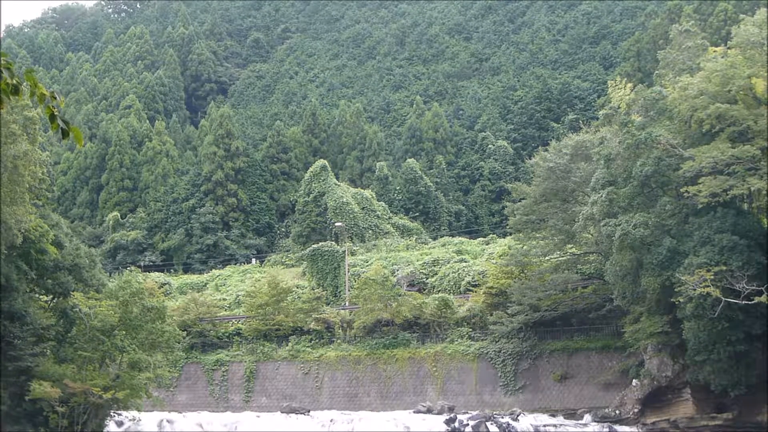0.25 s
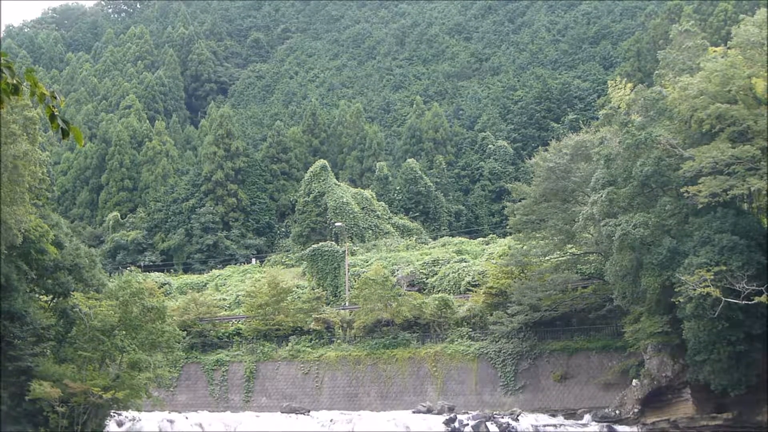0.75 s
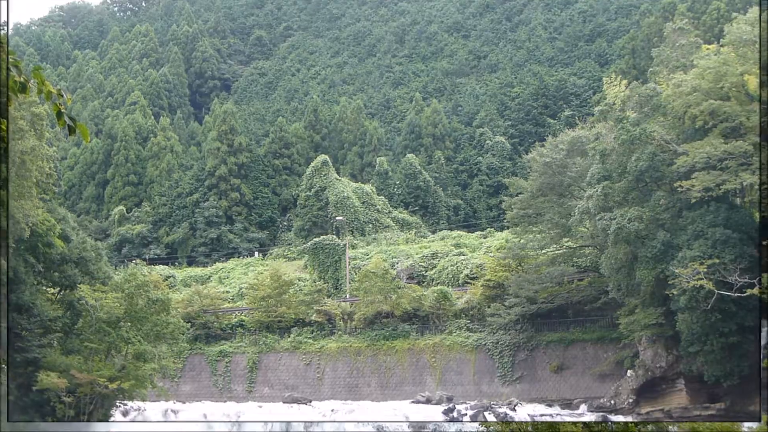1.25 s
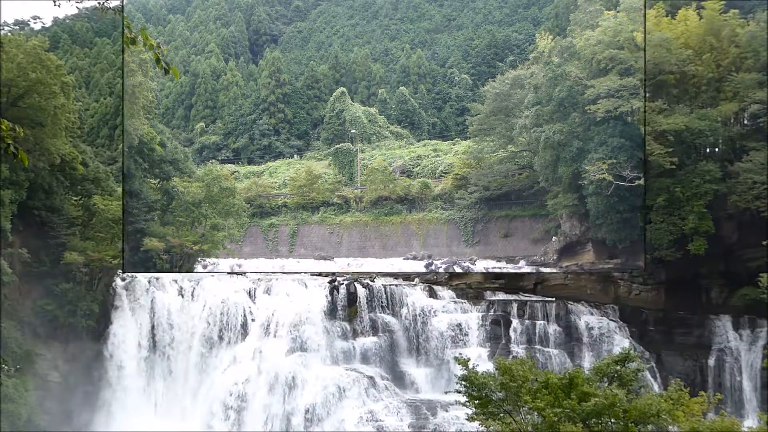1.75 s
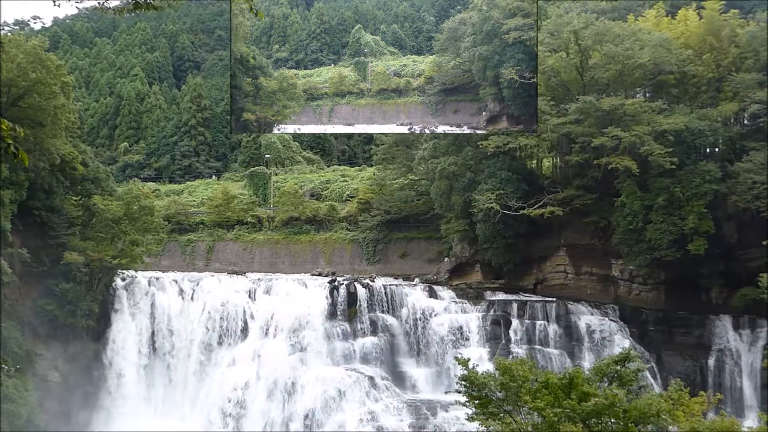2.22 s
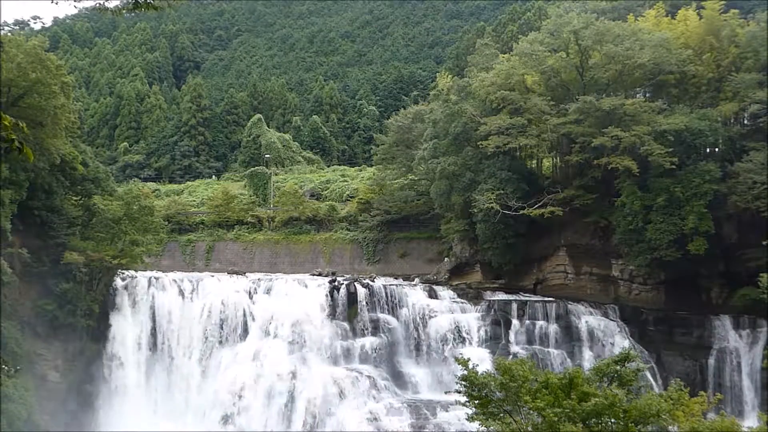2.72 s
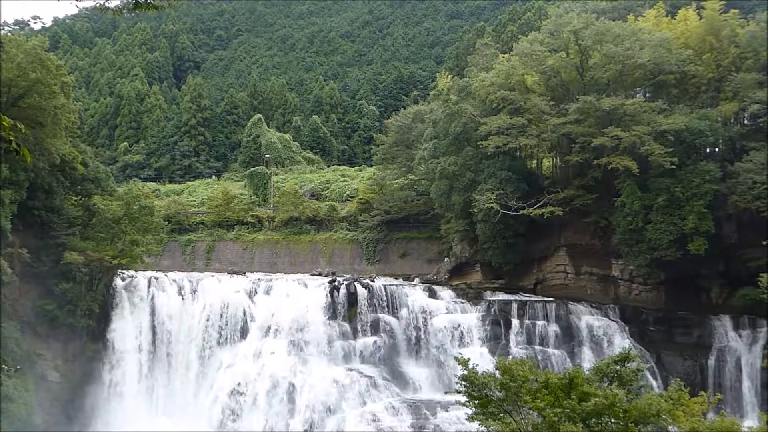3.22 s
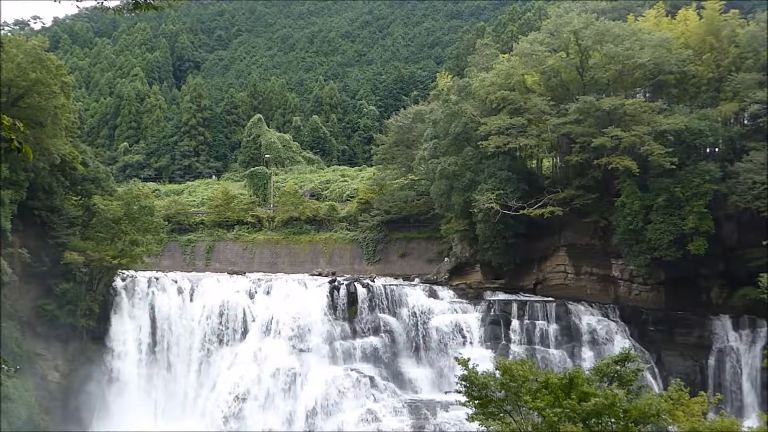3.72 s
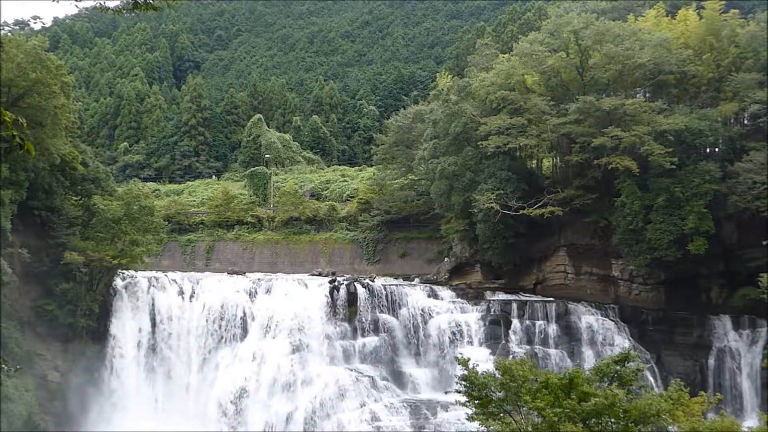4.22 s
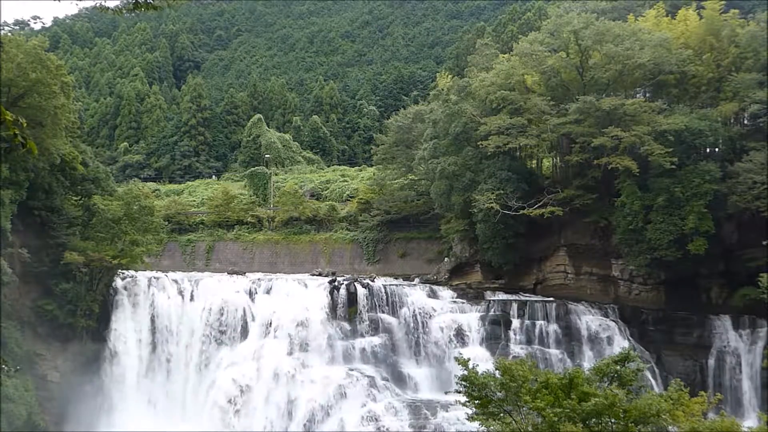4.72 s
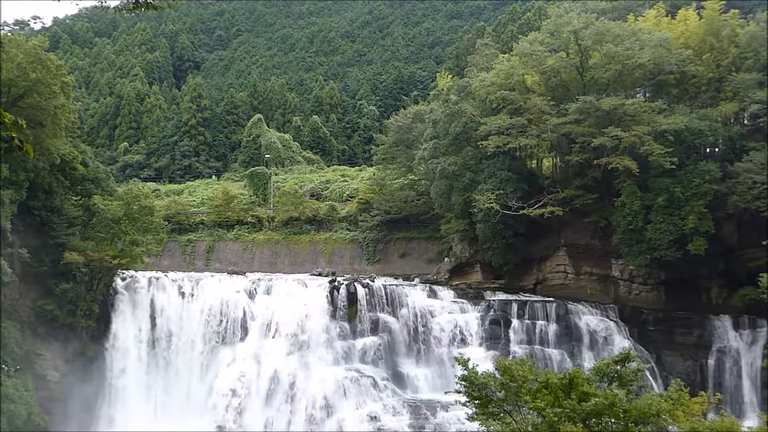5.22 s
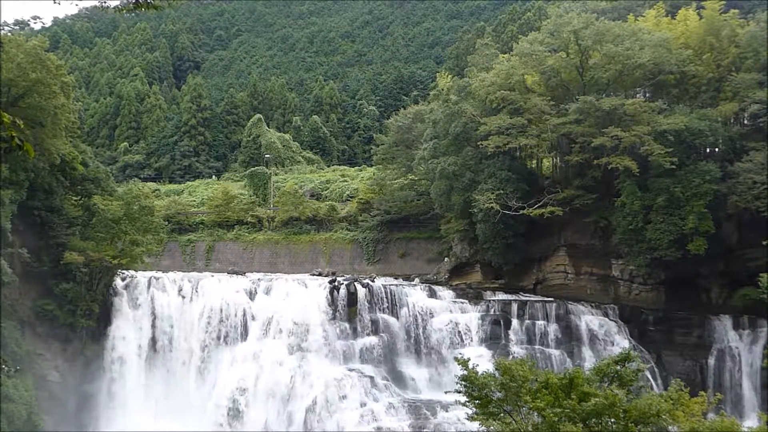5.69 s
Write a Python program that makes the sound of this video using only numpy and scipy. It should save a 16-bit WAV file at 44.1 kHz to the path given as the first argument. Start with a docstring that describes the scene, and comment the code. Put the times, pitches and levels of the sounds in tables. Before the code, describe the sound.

Stereo outdoor ambience in two abrupt passages. First, a microphone sheltered among trees picks up a raspy near cicada, a shimmering distant chorus, a rounded waterfall roar and three short, pure, high insect notes. A complete half-second silence follows. Then the microphone faces the open waterfall: broad constant rushing with brighter spray hiss, half masking the quivering cicadas. No splashes stand out.

```python
"""A waterfall in a wooded gorge with cicadas, heard from two places with a short silence between.
First, among the trees: loud cicadas, a softened roar and a few thin notes of a single insect.
Then, after the silence, facing the fall: the hiss of spray half covers the cicadas.
In both, the water is shaped noise with patchy swelling; cicadas are throbbing click trains through
resonances, one near and seven distant; the notes are slightly unsteady sines."""
import sys
import numpy as np
from scipy import signal
from scipy.fft import rfft, irfft, next_fast_len
from scipy.io import wavfile
from scipy.ndimage import uniform_filter1d, map_coordinates

SR = 44100
rng = np.random.default_rng(int(sys.argv[2]) if len(sys.argv) > 2 else 0)


def dump(signal):
    """Clip the signal to [-1, 1] and save it as 16-bit WAV at the path in sys.argv[1]."""
    limited = np.clip(np.atleast_2d(signal).T, -1, 1)
    pcm = np.round(limited * 32767).astype(np.int16)
    wavfile.write(sys.argv[1], SR, pcm)


N = 262395

# Span of each passage, sheltered then open: (start [s], end [s])
PASSAGE_SPANS_S = [(0, 1.5455), (1.983, 6)]
# Relative spectrum of the falling water: (frequency [Hz], gain [dB])
WATER_SHELTERED_DB = [(45, -36), (88, -25.5), (112, -14.5), (140, -15), (175, -7.5), (340, -0.5), (800, -4),
                      (1500, -7.5), (2400, -12), (4000, -10), (8500, -14), (10000, -15.5), (13000, -18.5),
                      (15500, -27.5)]
WATER_OPEN_DB = [(45, -36.5), (88, -24), (112, -14), (140, -11.5), (175, -5), (300, -0.5), (800, -3.5),
                 (1600, -8), (3300, -8), (6600, -11.5), (8000, -16), (10600, -12.5), (13300, -20.5),
                 (15500, -27)]
# Resonances of the distant cicadas' drums and hollow bodies: (centre [Hz], width [Hz], gain [dB])
BODY_SHELTERED_MODES = [(4100, 230, -4), (4890, 28, -2), (5343, 40, 4), (5200, 800, -5), (6540, 40, -2),
                        (6730, 60, -3), (6200, 900, -9), (7900, 1000, -13), (12650, 150, -16),
                        (13700, 200, -16), (14900, 700, -12)]
BODY_OPEN_MODES = [(4700, 1100, -4), (5820, 50, 5), (6230, 70, -1), (6600, 700, -5), (7200, 120, -6),
                   (8005, 60, -5), (14115, 110, -7)]
# Resonances of a near cicada: (centre [Hz], width [Hz], gain [dB])
BODY_NEAR_MODES = [(5500, 700, 0), (6450, 600, -2), (14950, 900, -7)]
# Likeness of left and right: (frequency [Hz], correlation [-1 to 1])
WATER_CORRELATION = [(150, 1), (450, 1), (800, 0.98), (1300, 0.83), (3000, 0.89), (4500, 0.73),
                     (9000, 0.79), (13000, .55)]
CICADA_CORRELATION = [(4000, 0.91), (8000, 0.82), (15000, 0.7)]
# Stereo tilt: (frequency [Hz], left minus right level [dB])
LEFT_MINUS_RIGHT_DB = [(700, 0), (1500, -.6), (4500, -.5), (5800, -1.4), (7500, -.8), (11000, -1.4),
                       (15000, -.3)]
# Slow level of the deep part of the roar: (time [s], level [dB])
DEEP_ROAR_DB = [(1.301, -0.4), (2.15, 0.7), (3.3, -1), (4.2, 0.5), (5.2, 1)]
# Thin notes of a single insect: (start [s], length [s], level [dB])
INSECT_NOTES = [(0.0, 0.15, -36), (.27, .09, -31), (1.137, 0.13, -30.5)]

ROAR_SHELTERED_DB, ROAR_OPEN_DB = -20.5, -20
DEEP_HZ = 1205  # the deep part is halved in amplitude here
NOTE_HZ, NOTE_WAVER_HZ, NOTE_EDGE_S = 4891, 9, .02
TOP_HZ = 15650  # upper band limit


def amp(db):
    """Decibels to gain."""
    return 10 ** (np.asarray(db) / 20)


def unit(x):
    """Scale to rms 1."""
    return x / np.sqrt(np.mean(x ** 2) + 1e-20)


def along(points, hz):
    """Read (Hz, value) points on a log frequency axis."""
    point_hz, value = np.transpose(points)
    return np.interp(np.log(hz + 1), np.log(point_hz + 1), value)


def wobble(rate_hz):
    """Smooth random curve with rate_hz knots a second."""
    knots = rng.standard_normal(int(N * rate_hz / SR) + 4)
    return map_coordinates(knots, [np.arange(N) * rate_hz / SR])


def filtered(x, response):
    """Apply a zero-phase frequency response to x."""
    m = next_fast_len(N + SR // 2)
    return irfft(rfft(x, m) * response(np.fft.rfftfreq(m, 1 / SR)), m)[..., :N]


def spread(pair, correlation):
    """Mix two unrelated signals to left and right with the given correlation."""
    def mid_side_gains(hz):
        angle = np.arccos(np.clip(along(correlation, hz), -1, 1)) / 2
        return np.array([np.cos(angle), np.sin(angle)])

    mid, side = filtered(pair, mid_side_gains)
    return np.array([mid + side, mid - side])


def waterfall(spectrum, level_db, patchy_db, surge_db):
    """Countless bubbles and drops merge into a roar; clumps swell it in patches of time and pitch."""
    z = signal.stft(rng.standard_normal((2, N)), nperseg=512)[2]
    clumps = uniform_filter1d(rng.standard_normal(z.shape[1:]), size=7, axis=0)  # across pitch
    clumps = uniform_filter1d(clumps, size=10, axis=1)  # across time
    foam = signal.istft(z * amp(patchy_db * unit(clumps)), nperseg=512)[1][:, :N]
    roar = unit(filtered(spread(foam, WATER_CORRELATION), lambda hz: amp(along(spectrum, hz))))
    deep = filtered(roar, lambda hz: 1 / (1 + (hz / DEEP_HZ) ** 4))
    spray = roar - deep
    deep_db = np.interp(np.arange(N) / SR, *np.transpose(DEEP_ROAR_DB))
    return (deep * amp(deep_db) + spray) * amp(level_db + surge_db * wobble(13))


def tymbal(click_hz, throb_hz, throb_db, swing, scatter_s):
    """One cicada's drums buckle some 400 times a second, in throbs that start fast and fade."""
    throb_cycles = np.cumsum(throb_hz * (1 + .02 * wobble(3))) / SR
    throb = 2 * np.pi * (throb_cycles + rng.random())
    effort = np.sin(throb) + .5 * np.sin(2 * throb)
    # the muscle runs slightly faster when it pulls harder
    click_rate_hz = click_hz * (1 + swing * (effort + .5 * wobble(5)))
    at = np.flatnonzero(np.diff(np.floor(np.cumsum(click_rate_hz) / SR)))
    late, size = rng.standard_normal((2, len(at)))
    where = np.clip(np.round(at + scatter_s * SR * late).astype(int), 0, N - 1)
    return np.bincount(where, amp(throb_db * effort[at] + 0.87 * size), N)


def scattered(x, t60_s):
    """Two unrelated smeared copies of x, as from trunks and leaves; decay of 60 dB in t60_s."""
    t = np.arange(SR // 4) / SR
    tails = rng.standard_normal((2, len(t))) * np.exp(-np.log(1000) * t / t60_s)
    return unit(signal.fftconvolve(x[None], tails, axes=1)[:, :N])


def resonances(modes, hz):
    """Gain of a set of resonances whose powers add."""
    power = 0
    for centre, width, db in modes:
        damping = (hz * width) ** 2
        power = power + amp(db) ** 2 * damping / ((centre ** 2 - hz ** 2) ** 2 + damping)
    return np.sqrt(power)


def near_cicada(click_hz, throb_hz, throb_db, level_db, bright_db, t60_s):
    """A close cicada: short scattering keeps its clicks distinct, a rasp of fuzzy harmonics."""
    clicks = tymbal(click_hz, throb_hz, throb_db, swing=.006, scatter_s=.000018)
    pair = spread(scattered(clicks, t60_s), CICADA_CORRELATION)
    treble = [(7000, 0.0038), (14000, bright_db)]  # (frequency [Hz], gain [dB])
    voice = filtered(pair, lambda hz: resonances(BODY_NEAR_MODES, hz) * amp(along(treble, hz)))
    return amp(level_db) * unit(voice)


def chorus(modes, level_db, dull_db, count=7):
    """Distant cicadas, each at its own pace, blurred and dulled by the forest."""
    voices = 0
    for a, b in rng.uniform(-1, 1, (count, 2)):
        clicks = tymbal(410 + 45 * a, 15 + 2 * b, throb_db=2.5, swing=.03, scatter_s=.0001)
        voices = voices + scattered(clicks, t60_s=0.11)
    pair = spread(unit(voices), CICADA_CORRELATION)
    air = [(7000, 0.0035), (14000, dull_db)]  # (frequency [Hz], gain [dB])
    return amp(level_db) * unit(filtered(pair, lambda hz: resonances(modes, hz) * amp(along(air, hz))))


def insect_notes():
    """One insect sounds a few short, nearly pure notes: a wavering sine, gated with linear edges."""
    t = np.arange(N) / SR
    pitch_hz = NOTE_HZ + NOTE_WAVER_HZ * wobble(60)
    tone = unit(np.sin(2 * np.pi * np.cumsum(pitch_hz) / SR))
    envelope = np.zeros(N)
    for start, length, db in INSECT_NOTES:
        to_edge_s = np.minimum(t - start, start + length - t)
        envelope += amp(db) * np.clip(to_edge_s / NOTE_EDGE_S, 0, 1)
    return tone * envelope


def sheltered_passage():
    """Among the trees the cicadas are loud and the spray is softened."""
    water = waterfall(WATER_SHELTERED_DB, ROAR_SHELTERED_DB, patchy_db=0.5, surge_db=0.5)
    near = near_cicada(click_hz=401.3, throb_hz=14.4, throb_db=4.0, level_db=-29.5, bright_db=1.5, t60_s=0.012)
    distant = chorus(BODY_SHELTERED_MODES, level_db=-25.3, dull_db=-3.0)
    return water + near + distant + insect_notes()


def open_passage():
    """Facing the fall, the hiss of spray half covers the cicadas."""
    water = waterfall(WATER_OPEN_DB, ROAR_OPEN_DB, patchy_db=0.45, surge_db=0.12)
    near = near_cicada(click_hz=392.7, throb_hz=15, throb_db=6.5, level_db=-33.5, bright_db=-2.0, t60_s=0.012)
    distant = chorus(BODY_OPEN_MODES, level_db=-29.5, dull_db=-7.5)
    return water + near + distant


def scene():
    """Two passages that start and stop abruptly, then the stereo tilt."""
    t = np.arange(N) / SR
    passages = np.zeros((2, N))
    for sound, (start, end) in zip([sheltered_passage(), open_passage()], PASSAGE_SPANS_S):
        passages += sound * ((t >= start) & (t < end))
    return filtered(passages, lambda hz: amp(np.outer([.5, -.5], along(LEFT_MINUS_RIGHT_DB, hz))))


def record(dry):
    """Band limit: a 200 Hz wide linear slope to silence around TOP_HZ."""
    return filtered(dry, lambda hz: np.clip((TOP_HZ - hz) / 200 + .5, 0, 1))


dry = scene()
out = record(dry)
dump(out)
```